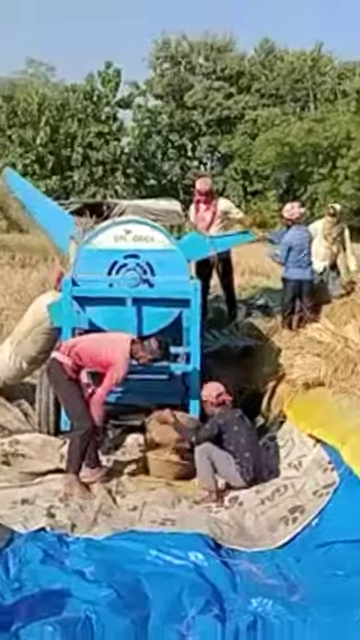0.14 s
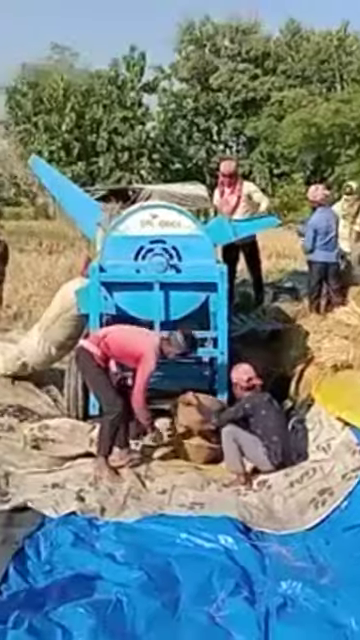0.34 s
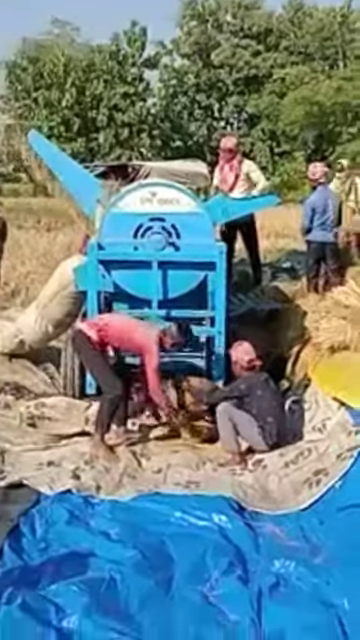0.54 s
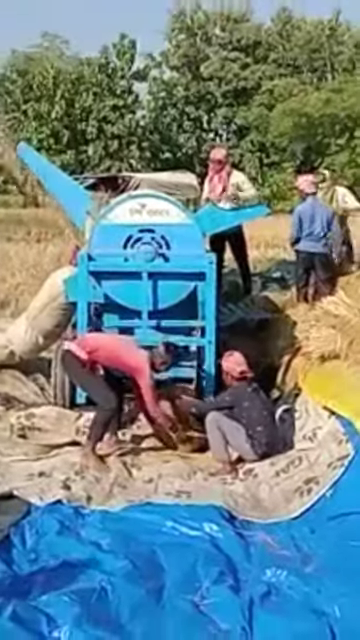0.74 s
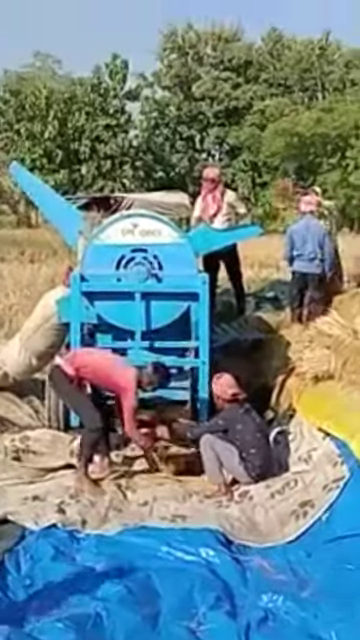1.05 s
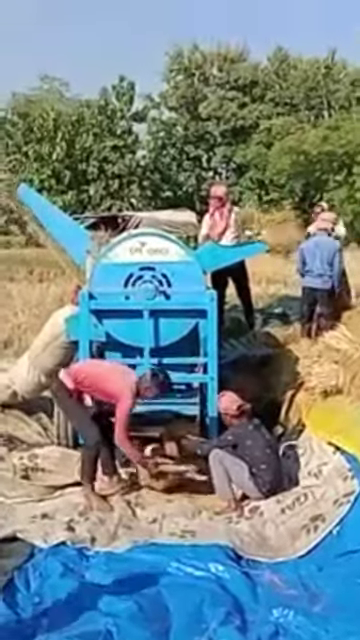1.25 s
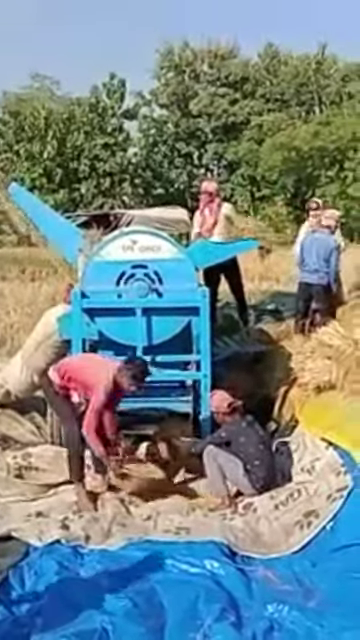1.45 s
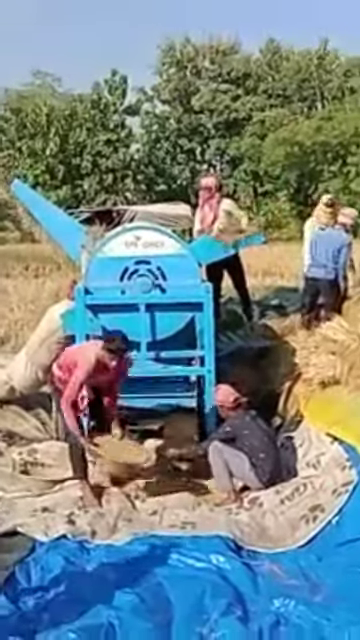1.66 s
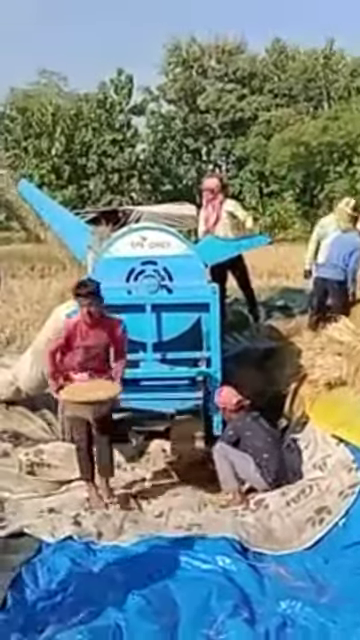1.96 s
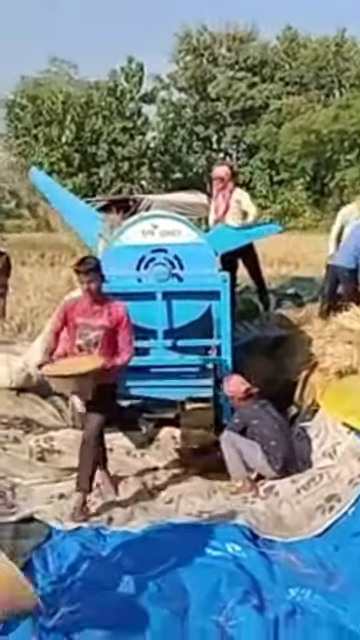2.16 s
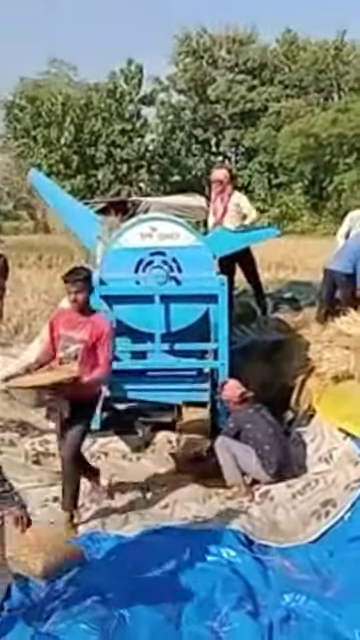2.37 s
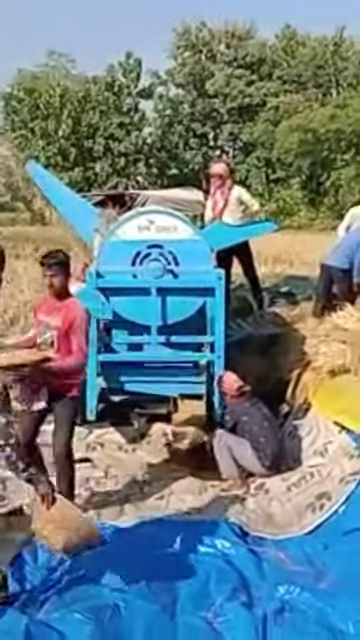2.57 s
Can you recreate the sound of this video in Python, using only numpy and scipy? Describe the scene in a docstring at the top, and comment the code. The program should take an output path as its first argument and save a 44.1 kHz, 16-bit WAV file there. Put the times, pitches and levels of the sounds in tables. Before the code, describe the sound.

A threshing machine with a diesel engine fades in quickly from silence, then runs steadily in an open field: low hum, churning air and straw, dense grain pelting sheet metal, soft thuds and short metallic rings.

```python
"""Threshing machine and diesel engine

The two run steadily in an open field, and the sound fades in from silence.
Engine firings and drum beaters hum as sums of sine waves that waver a little. Short swelling tones
make the thuds of the sieve, the rings of the panels and the flares of the metal casing.
Filtered noise makes the roar of air and straw, and random clicks and noise pelt and ring the casing
as grain does. A faint hiss lies on top."""
import sys
import numpy as np
from scipy import signal
from scipy.fft import rfft, irfft
from scipy.io import wavfile
from scipy.ndimage import uniform_filter1d

SR = 44100
rng = np.random.default_rng(int(sys.argv[2]) if len(sys.argv) > 2 else 0)


def int16_out(signal):
    """Quantize to a 16-bit WAV file."""
    q = np.round(np.clip(np.atleast_2d(signal).T, -1, 1) * 32767)
    wavfile.write(sys.argv[1], SR, q.astype(np.int16))


def nominal_scale(level):
    """Amplitude ratio for a level in decibels (scalar or array-like)."""
    x = np.asarray(level, float) / 20
    return 10 ** x


N = 119952  # length in samples

# The engine's course. Each row: time in seconds, four times the firing rate in Hz, level in dB.
ENGINE = [(0.2, 117.7, -50), (0.22, 117.6, -41.5), (0.55, 117.9, -40.5), (0.62, 117.7, -47),
          (0.66, 116.8, -40.5), (0.7, 116.1, -49.5), (1.08, 115.2, -52.5), (1.1, 115.1, -37),
          (1.12, 114.9, -46.5), (1.27, 114.8, -41.5), (1.86, 115.0, -47), (2.23, 114.7, -42.5),
          (2.23, 114.5, -48), (2.54, 113.7, -44.5), (2.6, 113.8, -33), (2.63, 113.7, -50),
          (2.64, 113.7, -45), (2.72, 113.8, -46)]
# Crop fed to the drum. Each row: time in seconds, gain of the grain sound in dB,
# gain of the casing's treble ring in dB.
FEED = [(0.3, -43.5, 1), (0.39, -42.5, -2), (0.78, -40, -3.5), (0.85, -35, -16), (0.89, -41, -1),
        (0.93, -41, -23.5), (0.96, -43, -3), (1.01, -42, -5), (1.43, -42.5, 2), (1.54, -42, -6),
        (1.58, -42.5, 6.5), (1.61, -37.5, -28), (1.66, -43, -3.5), (2.19, -41, -3), (2.24, -41.5, 10.5),
        (2.3, -38, -7.5), (2.37, -39, 2.5), (2.44, -44.5, 2.5), (2.45, -42, -8), (2.6, -41, -7.5),
        (2.62, -43, 2), (2.72, -42.5, -7)]


def level(x, db):
    """Scale a sound to an rms level in dB."""
    return x * nominal_scale(db) / np.sqrt(np.mean(x ** 2))


def curve(table, column):
    """Draw straight lines through one column of a table, against the time in its first column."""
    points = np.array(table)
    return np.interp(np.arange(N) / SR, points[:, 0], points[:, column])


def walk(rate):
    """Wander at random around 0 with a spread near 1: new values `rate` times a second, smoothed twice."""
    hold = int(SR / rate)
    steps = np.repeat(rng.standard_normal(N // hold + 1), hold)
    smooth = uniform_filter1d(uniform_filter1d(steps, hold), hold)
    return 1.3 * smooth[:N]  # smoothing shrank the spread


def colour(x, table):
    """Filter a sound by a gain curve given as (Hz, dB) points."""
    points = np.array(table)
    hz = np.fft.rfftfreq(N, 1 / SR) + 1  # the 1 avoids log(0)
    gain_db = np.interp(np.log(hz), np.log(points[:, 0]), points[:, 1])
    return irfft(rfft(x) * nominal_scale(gain_db), N)


def ring(x, hz, width_hz):
    """Pass a sound through one resonance and scale the result to rms 1."""
    return level(signal.lfilter(*signal.iirpeak(hz, hz / width_hz, SR), x), 0)


def flickering(x, edges_hz, own_db, rate):
    """Split a sound into bands, let the level of each wander on its own, and add them up again."""
    spectrum, hz = rfft(x), np.fft.rfftfreq(N, 1 / SR)
    out = np.zeros(N)
    for low, high in zip(edges_hz[:-1], edges_hz[1:]):
        band = irfft(spectrum * ((hz >= low) & (hz < high)), N)
        out += band * nominal_scale(own_db * walk(rate))
    return out


def swell(s, length, db):
    """Loudness of one event: a smooth hump from 0.31 lengths before time s, 1.5 lengths long in all."""
    progress = np.clip((np.arange(N) / SR - s) / length + 0.31, 0, 1.5) / 1.5
    return nominal_scale(db) * np.sin(np.pi * progress) ** 2


def top_hiss():
    """Faint high noise whose level in dB moves half as far as that of the fed crop."""
    # Colour of the hiss. Each row: frequency in Hz, noise power per Hz in relative dB.
    hiss_colour = [(9000, -28), (9800, -1), (11000, -7), (11600, -8), (12300, -10), (12900, -15),
                   (13500, -7), (13900, -8), (14300, -22), (14650, -17), (14950, -21), (15400, -15)]
    hiss = level(colour(rng.standard_normal(N), hiss_colour), -71.5)
    return hiss * nominal_scale(0.5 * (curve(FEED, column=1) + 46.5) + 1.2 * walk(20))


def roar():
    """Air and straw churn in the drum as flickering noise and sound the hollow housing."""
    # Colour of the churning. Each row: frequency in Hz, noise power per Hz in relative dB.
    churn_colour = [(18, -40), (30, -15.5), (65, -4.5), (96, -1.5), (113, -7), (135, -3), (167, -6.5),
                    (282, -1), (398, -11.5), (485, -7), (620, -7.5), (706, -8), (874, -2.5), (1120, -15.5),
                    (1500, -22.5), (1950, -30), (3300, -120)]
    # Hollow tones of the housing. Each row: frequency in Hz, width in Hz, level against the churn in dB.
    housing = [(858, 64, -17.5), (500, 37, -18), (1065, 39, -23)]
    noise = rng.standard_normal(N)
    churn = flickering(colour(noise, churn_colour), np.geomspace(20, 2000, num=15), own_db=2.0, rate=16)
    hollow = sum(nominal_scale(db + 4.2 * walk(20)) * ring(noise, hz, width) for hz, width, db in housing)
    return nominal_scale(-40) * (level(churn, 0) + hollow)


def grain():
    """Dense random hits pelt the casing and ring its resonances, which flare at random."""
    # Colour of the pelting. Each row: frequency in Hz, noise power per Hz in relative dB.
    pelt_colour = [(710, -47), (1200, -5.5), (1490, -7), (1750, -2.5), (2040, 0), (2420, -4), (2720, -2.5),
                   (3190, -6), (3530, -4), (4510, -5.5), (5250, -6), (6110, -4.5), (6590, -6), (7670, -2.5),
                   (9000, -16), (11700, -29), (19800, -120)]
    # Casing resonances. Each row: frequency in Hz, width in Hz, relative level in dB.
    casing = [(1780, 180, -15.5), (2294, 125, -13), (2436, 102, -8.5), (3110, 195, -12.5), (3953, 70, -19),
              (4403, 43, -19), (5640, 270, -18.5), (6240, 150, -11), (6920, 170, -14), (9220, 330, -23.5)]
    # Treble resonances that follow the feed. Each row: frequency in Hz, width in Hz, relative level in dB.
    treble_ring = [(7040, 140, -13.5), (7594, 124, -3.5), (8020, 160, -11)]
    grains_per_s = 5000

    draw = rng.random((N, 2))  # whether a grain lands on this sample, and how hard
    clicks = (draw[:, 0] < grains_per_s / SR) * (2 * draw[:, 1] - 1)
    hits = level(clicks, -2.5) + 0.85 * rng.standard_normal(N)
    pelt = flickering(colour(hits, pelt_colour), np.geomspace(800, 16000, num=22), own_db=1.55, rate=22)

    def modes(table):
        return sum(nominal_scale(db + 3.2 * walk(18)) * ring(hits, hz, width) for hz, width, db in table)

    # many thin resonances at random pitches, each 52 Hz wide
    thin = sum(nominal_scale(5.2 * walk(15)) * ring(hits, hz, 52.0) for hz in rng.uniform(890, 9200, size=60))
    ringing = modes(casing) + nominal_scale(curve(FEED, column=2)) * modes(treble_ring)
    ringing = colour(ringing, [(8400, -3.5), (9400, -5), (10000, -38), (12000, -58)])
    body = level(pelt, -1.4) + level(colour(thin, pelt_colour), -9) + ringing
    return body * nominal_scale(curve(FEED, column=1) + 0.75 * walk(39.92))


def casing_flares():
    """A casing mode, scraped or pelted harder, swells as a tone with rough loudness and phase."""
    # Each row: time in seconds, length in seconds, peak level in dB, pitch in Hz.
    flares = [(0.644, 0.037, -41, 2800), (.72, 0.073, -44, 4540), (0.766, 0.079, -49, 5640),
              (0.778, 0.08, -53, 2300), (0.795, 0.032, -46, 2600), (0.788, .09, -48, 6050),
              (.82, .06, -39, 3130), (0.832, 0.091, -49, 3790), (0.889, 0.044, -38.5, 2270),
              (1.226, 0.15, -42, 872), (1.427, 0.11, -47, 2315), (1.83, .1, -45, 6170),
              (1.86, .11, -46, 2370), (1.993, 0.089, -40.5, 847), (2.08, 0.13, -49, 6200),
              (2.123, .12, -50, 4350), (2.2, 0.066, -43, 1780), (2.273, 0.057, -43, 6230),
              (2.26, 0.14, -40, 2490), (2.333, 0.073, -49, 1780), (2.342, .06, -38.5, 828),
              (2.47, 0.24, -48.5, 2372)]
    out, t = np.zeros(N), np.arange(N) / SR
    for s, length, db, hz in flares:
        tone = np.sin(2 * np.pi * hz * t + 0.95 * walk(120))  # phase wander in radians
        out += swell(s, length, db + 5.0 * walk(90)) * tone
    return out


def knocks():
    """The sieve thuds softly and low, and panels ring briefly, as tones that waver slightly."""
    # Sieve thuds. Each row: time in seconds, peak level in dB, pitch in Hz.
    thuds = [(.42, -54, 95), (.54, -40.5, 90), (0.644, -33.5, 85), (.87, -35, 70), (1.09, -37.5, 85),
             (1.31, -33.5, 85), (1.53, -50, 80), (1.76, -49, 65), (1.96, -38, 85), (2.22, -37, 80),
             (2.43, -37, 75), (2.56, -30, 90), (2.67, -40, 70)]
    # Panel rings. Each row: time in seconds, length in seconds, peak level in dB, pitch in Hz.
    rings = [(0.355, 0.057, -39, 865), (0.987, .06, -41.5, 500), (1.275, 0.063, -37.5, 830),
             (1.373, 0.14, -40.5, 500), (1.513, 0.074, -40.5, 1060), (1.788, 0.033, -34.5, 870),
             (1.81, 0.17, -38, 500), (1.816, 0.1, -37, 250), (1.99, 0.077, -40, 270),
             (2.037, .06, -46, 1090), (2.286, 0.045, -28.5, 500), (2.52, 0.05, -50, 890)]
    thud_s = 0.044
    events = [(s, thud_s, db, hz) for s, db, hz in thuds] + list(rings)
    out, t = np.zeros(N), np.arange(N) / SR
    for s, length, db, hz in events:
        tone = np.sin(2 * np.pi * hz * t + 0.76 * walk(30.24))  # phase wander in radians
        out += swell(s, length, db + 0.61 * walk(40)) * tone
    return out


def firing_phase():
    """Add up the changing firing rate into a phase in radians, which engine and drum share."""
    lead_s = 0.009906  # how far into its cycle the engine starts
    cycles = np.cumsum(curve(ENGINE, column=1) / 4) / SR
    return 2 * np.pi * (cycles + ENGINE[0][1] / 4 * lead_s)


def drum(phase):
    """The drum's beaters hum at multiples of their beat, which is geared to the engine."""
    # Each row: multiple of the drum beat, rms level in dB.
    lines = [(6, -58.5), (7, -56.5), (8, -59.5), (13, -59), (22, -59.5)]
    beats_per_firing = 4 / 3
    out = np.zeros(N)
    for multiple, db in lines:
        tone = np.sin(multiple * beats_per_firing * phase + 0.75 * walk(4.65))
        out += nominal_scale(db + 1.83 * walk(9.14)) * tone
    return np.sqrt(2) * out  # a sine's peak is root 2 times its rms


def engine(phase):
    """Firings in the exhaust sound as sine waves at low multiples of the firing rate."""
    # Each row: multiple of the firing rate, gain on the engine level in dB.
    orders = [(2, -15), (3, -10), (4, 2), (5, -13)]
    tones = sum(nominal_scale(db + 1.7 * walk(12.14)) * np.sin(k * phase) for k, db in orders)
    return np.sqrt(2) * tones * nominal_scale(curve(ENGINE, column=2))


def scene():
    """Add all sources into one channel; the machine's treble falls away steeply, the hiss stays."""
    phase = firing_phase()
    machine = roar() + grain() + casing_flares() + knocks() + drum(phase) + engine(phase)
    machine = colour(machine, [(9300, -0.5), (9900, -6), (11000, -37), (12000, -60)])
    return (machine + top_hiss())[None]


def low_pass(x):
    """Removes everything above the highest recorded frequency."""
    return signal.sosfilt(signal.butter(12, 15480, fs=SR, output="sos"), x)


def record(dry):
    """Fade the sound in from silence and return the finished mix."""
    fade_start_s, fade_s = 0.131, 0.28
    fade = np.clip((np.arange(N) / SR - fade_start_s) / fade_s, 0, 1) ** 0.66
    return low_pass(dry * fade)


dry = scene()
out = record(dry)
int16_out(out)
```